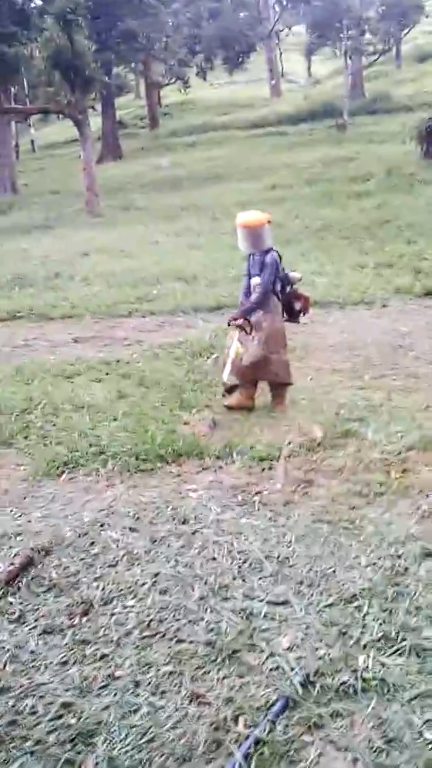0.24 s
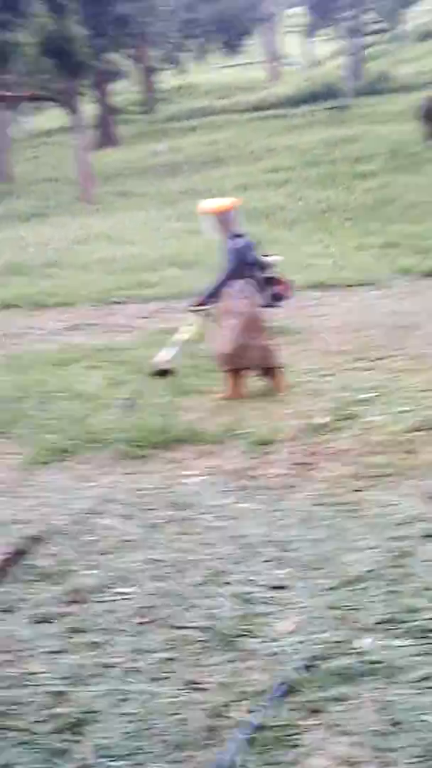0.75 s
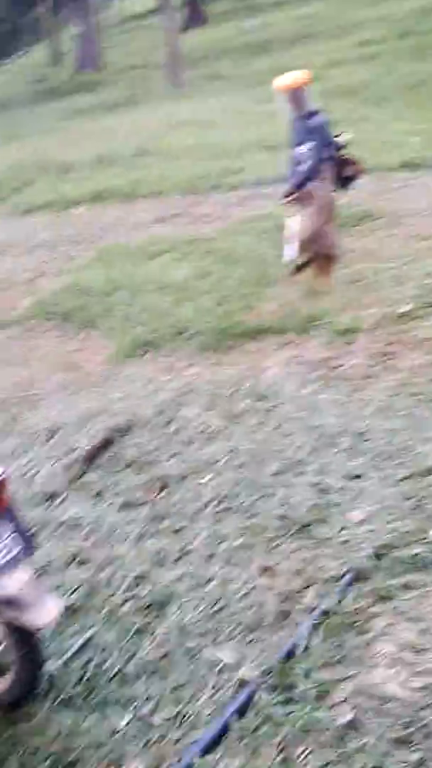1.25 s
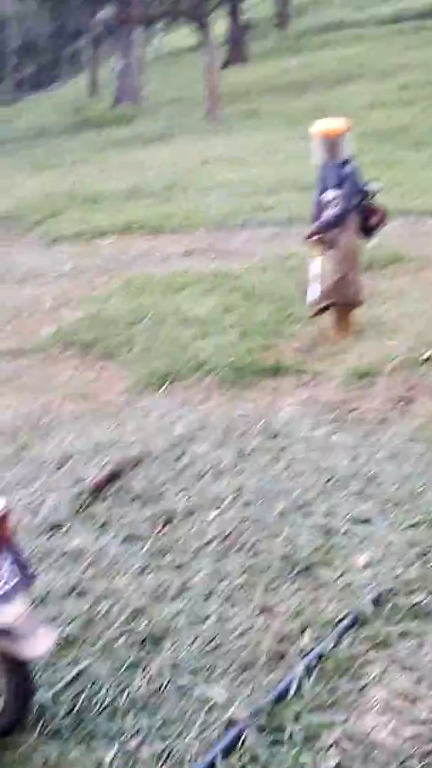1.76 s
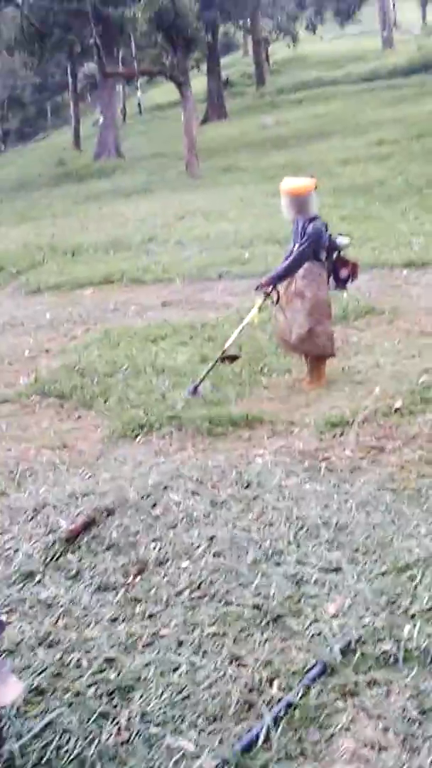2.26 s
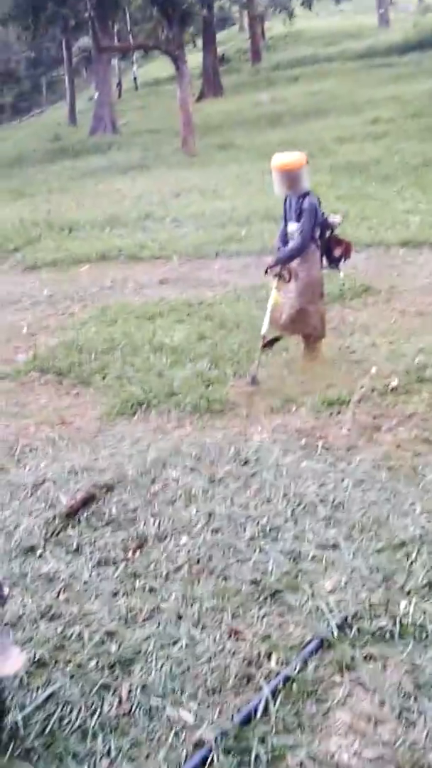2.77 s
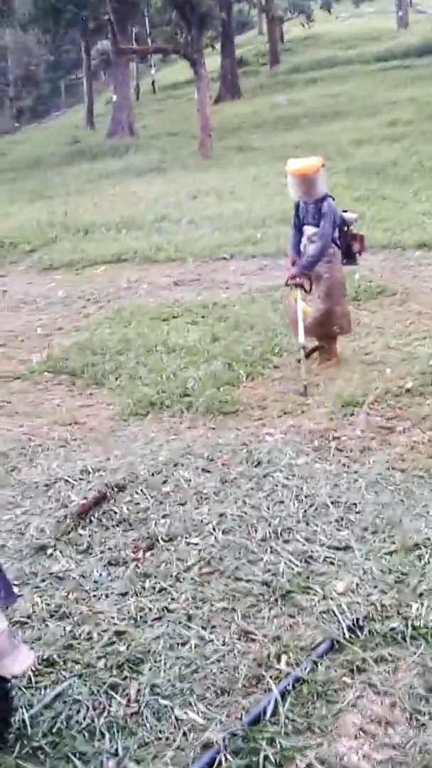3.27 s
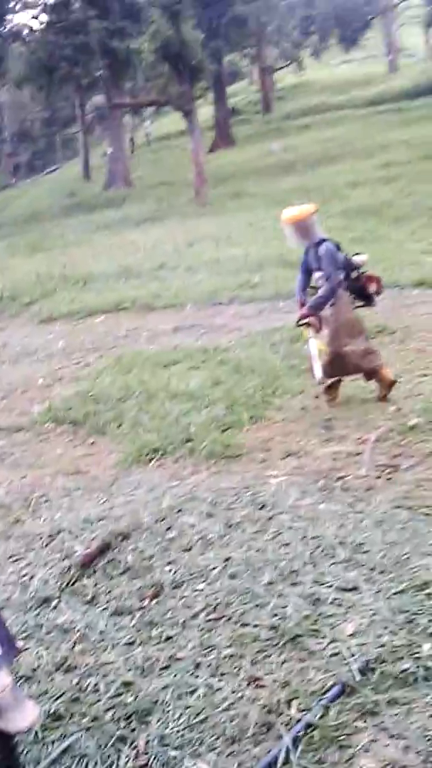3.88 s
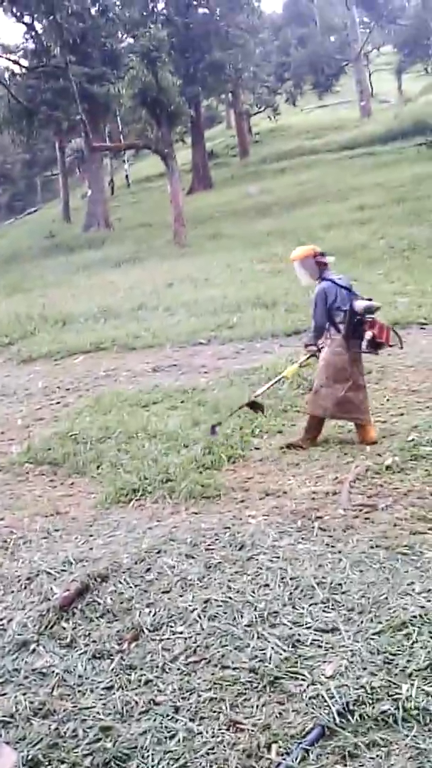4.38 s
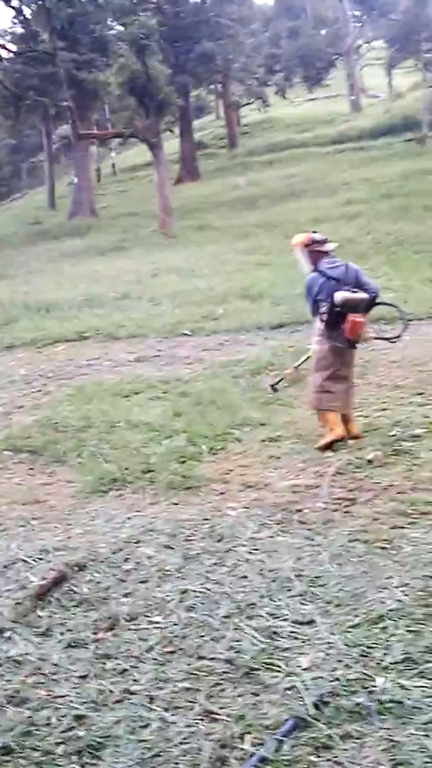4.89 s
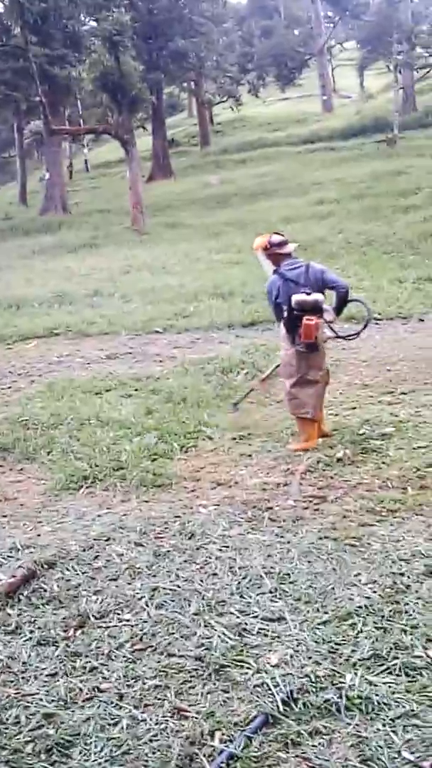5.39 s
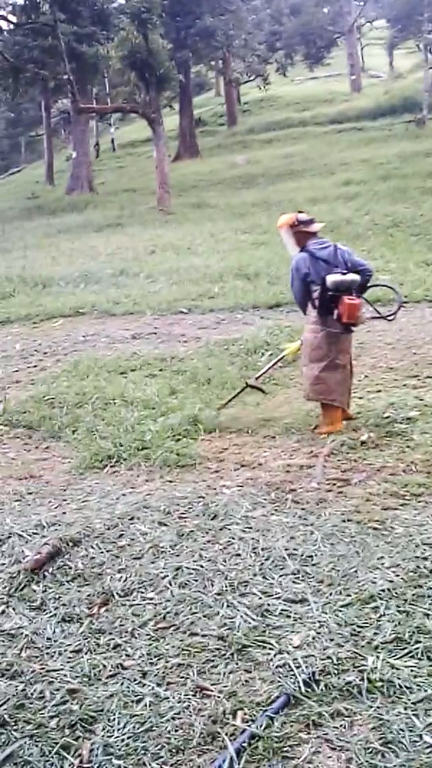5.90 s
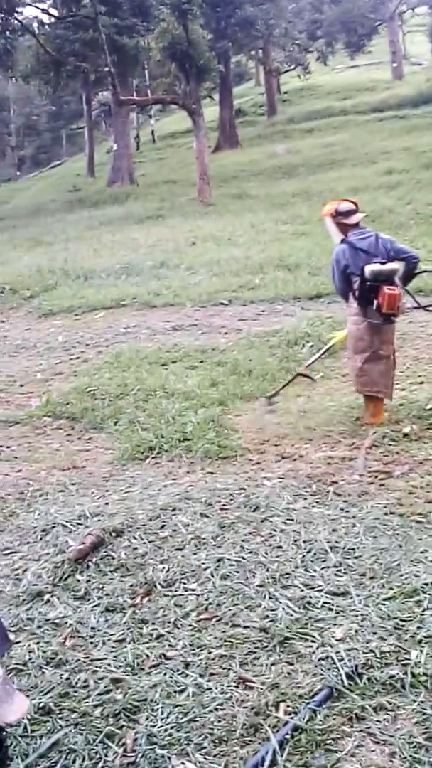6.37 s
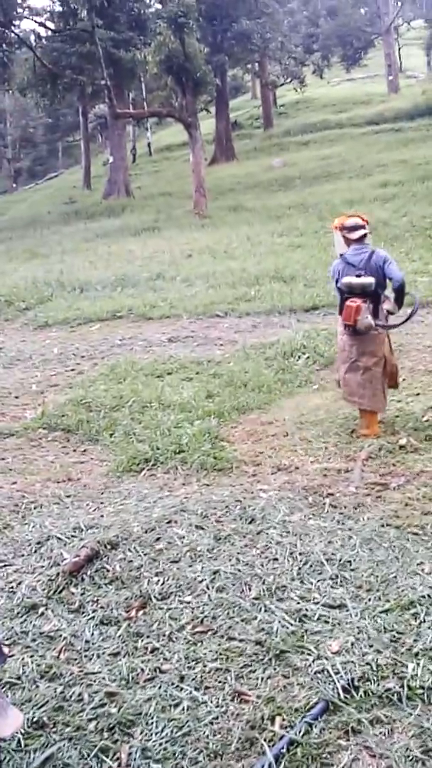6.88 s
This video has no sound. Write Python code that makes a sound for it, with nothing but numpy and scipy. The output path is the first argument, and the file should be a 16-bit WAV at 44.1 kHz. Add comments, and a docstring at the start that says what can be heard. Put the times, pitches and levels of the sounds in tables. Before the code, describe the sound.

Bright, hissing nylon-line whistle and sharp crackling stem snaps over a droning little petrol engine, some metres away outdoors, with one brief rise in revs.

```python
"""Open field: a backpack brush cutter works through grass, some metres from a small microphone.
The two-stroke engine holds its speed while the clutch slips, and rises once when the head runs free.
It sounds as steady overtones plus noise puffed out at each firing; the tone changes as the worker turns.
The two nylon lines whistle (noise pulsed by the turn) and chop stems (short bursts), slower under load.
Tough stems snap brightly; the soil echoes the head; a faint murmur and a high hiss lie underneath."""
import sys
import numpy as np
from scipy import signal
from scipy.fft import rfft, irfft, next_fast_len
from scipy.io import wavfile
from scipy.ndimage import uniform_filter1d, minimum_filter1d, map_coordinates

SR = 44100
rng = np.random.default_rng(int(sys.argv[2]) if len(sys.argv) > 2 else 0)


def to_wav(s):
    """Save 16-bit WAV."""
    ch = np.atleast_2d(s).T  # columns
    pcm = np.round(np.clip(ch, -1, 1) * 32767)  # PCM
    wavfile.write(sys.argv[1], SR, pcm.astype(np.int16))


N = 314874


def amp(db):
    """Amplitude factor of a level in dB."""
    return 10 ** (np.asarray(db) / 20)


def unit(x):
    """x scaled to rms 1."""
    return x / np.sqrt(np.mean(x ** 2) + 1e-20)


def curves(rows):
    """One value per sample for each column after start_s, linear between rows."""
    start_s, *columns = np.transpose(rows)
    return [np.interp(np.arange(N) / SR, start_s, column) for column in columns]


def wobble(rate_hz):
    """Random curve: normal knots, rate_hz a second, joined by lines."""
    knots = rng.standard_normal(int(N * rate_hz / SR) + 4)
    return map_coordinates(knots, [np.arange(N) * rate_hz / SR], order=1)


def coloured(x, points):
    """x through a minimum-phase filter of power gain 1, drawn by (freq_hz, gain_db) points."""
    freq_hz, gain_db = np.transpose(points)
    size = 8192
    bins_hz = np.fft.rfftfreq(size, 1 / SR)
    gain = amp(np.interp(np.log(bins_hz + 1), np.log(freq_hz + 1), gain_db))
    cepstrum = irfft(np.log(gain + 1e-6))
    cepstrum[1:size // 2] *= 2  # folding the cepstrum makes the filter causal
    cepstrum[size // 2 + 1:] = 0
    response = irfft(np.exp(rfft(cepstrum)))
    return signal.fftconvolve(x, response / np.linalg.norm(response))[:N]


def bursts(samples, sizes, t60_s, tail_db):
    """A sharp blow at each sample index, followed by a dying puff of noise, cut off at 400 samples."""
    t = np.arange(400) / SR
    puffs = amp(-60 * t / t60_s) * rng.standard_normal((len(sizes), len(t)))
    puffs *= amp(tail_db) / np.linalg.norm(puffs, axis=1)[:, None]
    puffs[:, 0] = 1
    where = np.asarray(samples)[:, None] + np.arange(len(t))
    return np.bincount(where.ravel(), (sizes[:, None] * puffs).ravel(), N + len(t))[:N]


# engine overtones at four bearings of the worker: multiple_of_firing, level_db
OVERTONES_SIDE_ON = [(1, -26.5), (2, -22), (3, -25), (4, -22.5), (5, -21.5), (6, -9), (7, -58), (8, -47),
                     (9, -4.5), (10, 4), (11, -1), (12, -2), (13, -19), (14, -9.5), (15, -16), (16, -12),
                     (17, -9.5), (18, -34), (19, -34), (20, -15), (21, -39), (22, -13), (23, -41),
                     (24, -32), (25, -34), (26, -43), (27, -27), (28, -27), (29, -43), (30, -61)]
OVERTONES_FACING = [(1, -24), (2, -22.5), (3, -21.5), (4, -38), (5, -28), (6, -18), (7, -19), (8, -5),
                    (9, -2.5), (10, 4.5), (11, -5), (12, -5.5), (13, -28), (14, -13.5), (15, -17),
                    (16, -43), (17, -49), (18, -15), (19, -18), (20, -14.5), (21, -27), (22, -27),
                    (23, -22), (24, -14), (25, -16), (26, -13.5), (27, -16.5), (28, -41), (29, -20.5),
                    (30, -27)]
OVERTONES_TURNING = [(1, -26), (2, -26), (3, -21), (4, -40), (5, -15.5), (6, -11.5), (7, -12.5), (8, -13),
                     (9, -4), (10, 4.5), (11, -10), (12, -9.5), (13, -11), (14, -23), (15, -19), (16, -26),
                     (17, -24), (18, -15), (19, -30), (20, -28), (21, -19), (22, -25), (23, -28), (24, -34),
                     (25, -29), (26, -36), (27, -21), (28, -35), (29, -24), (30, -34)]
OVERTONES_BACK_ON = [(1, -25), (2, -23), (3, -20), (4, -40), (5, -25.5), (6, -11.5), (7, -4.5), (8, -11.5),
                     (9, -3.5), (10, 3.5), (11, -10), (12, -7), (13, -25), (14, -91), (15, -17),
                     (16, -13.5), (17, -13.5), (18, -31), (19, -13), (20, -49), (21, -22), (22, -37),
                     (23, -56), (24, -18.5), (25, -17.5), (26, -32), (27, -17.5), (28, -43), (29, -17),
                     (30, -17.5)]
# engine cover resonances: freq_hz, gain_db
COVER_RING = [(1500, 0), (1640, 5), (1780, 0), (2300, 0), (2460, 9), (2620, 0)]


def muffler_note(crank, bearing):
    """Steady overtones of the firing rate leave the muffler; the engine cover rings along."""
    tables = [OVERTONES_SIDE_ON, OVERTONES_FACING, OVERTONES_TURNING, OVERTONES_BACK_ON]
    levels_db = np.array(tables)[:, :, 1].T
    flutter_db = 1.1
    note = np.zeros(N)
    for k, bearing_db in enumerate(levels_db, 1):
        lag = np.angle(1 / (1 - (k / 10) ** 2 + .6j * k / 10))  # muffler rings near the tenth overtone
        lag -= 0.0987 * (k - 10) ** 2  # higher overtones leave the pipe later
        level_db = np.interp(bearing, range(4), bearing_db) + flutter_db * wobble(5)
        note += amp(level_db) * np.cos(k * crank + lag)
    return coloured(note, COVER_RING)


# cooling fan whine: multiple_of_firing, level_db
FAN_WHINE = [(53, -9.5), (54, -1.5), (55, -21)]


def fan_whine(crank, behind):
    """Cooling fan tones locked to the crank, heard from behind."""
    return behind * sum(amp(db + 6.0 * wobble(7.2)) * np.cos(k * crank) for k, db in FAN_WHINE)


# exhaust roar spectrum: freq_hz, gain_db
ROAR_SPECTRUM = [(300, -46.5), (450, -15), (650, -7), (800, -3.5), (900, -0.5), (1100, -2), (1300, -11),
                 (1650, -5), (2100, -14.5), (2450, -5.5), (3000, -8.5), (5000, -113)]


def exhaust_roar(crank):
    """Noise puffed out at each firing."""
    puff = np.exp(0.087 * np.cos(crank - .6))
    return unit(coloured(puff * rng.standard_normal(N), ROAR_SPECTRUM))


# cylinder fin resonance: freq_hz, gain_db
CYLINDER_FINS = [(1800, -50), (2250, -16), (2450, 0), (2650, -16), (3200, -50)]


def fin_rattle(crank, behind):
    """Each firing knocks the cylinder fins, heard from behind."""
    firings = np.flatnonzero(np.diff(np.floor(crank / (2 * np.pi) - .3)))
    sizes = amp(1.5 * rng.standard_normal(len(firings)))
    knocks = bursts(firings, sizes, t60_s=.01, tail_db=-8)
    return behind * amp(-47 + 2.5 * wobble(3)) * unit(coloured(knocks, CYLINDER_FINS))


# firing rate, held by the slipping clutch, one free rev: start_s, firing_hz
FIRING_RATE = [(0, 88.17), (3.36, 88.15), (3.46, 87.5), (4.06, 87.4), (4.35, 92.9), (4.5, 94.3),
               (4.65, 95.3), (4.8, 93.9), (5.1, 89.4), (5.25, 88.55), (5.45, 88.25), (7.14, 88.15)]
# engine levels: start_s, note_db, roar_db
ENGINE_LEVELS = [(0, -44.5, -42), (.87, -40, -44), (1.05, -37, -42), (2.24, -40.5, -45),
                 (3.3, -40.5, -40.5), (3.86, -41, -39), (4.3, -36, -43), (4.53, -38, -44),
                 (4.71, -35.5, -41.5), (4.95, -37, -39), (5.55, -38.5, -39), (6.34, -40, -41),
                 (6.66, -38, -38), (7.14, -40, -44)]
# worker's bearing: start_s, bearing (0 side-on, 1 facing, 2 turning, 3 back-on)
WORKER_BEARING = [(0, -0.5), (.85, 0), (1.2, 0.7), (2, 1), (3.9, 1), (4.4, 2.5), (4.8, 2.5), (5.3, 3.5),
                  (7.14, 3)]


def engine():
    """One firing a turn drives note, fan, roar and rattle; their mix follows the worker's bearing."""
    firing_hz, = curves(FIRING_RATE)
    note_db, roar_db = curves(ENGINE_LEVELS)
    bearing, = curves(WORKER_BEARING)
    behind = np.clip(bearing - 1.5, 0, 1)
    jittered_hz = firing_hz * (1 + 0.00042 * wobble(30))
    crank = 2 * np.pi * (.48 + np.cumsum(jittered_hz) / SR)
    tones = muffler_note(crank, bearing) + fan_whine(crank, behind)
    roar = exhaust_roar(crank)
    rattle = fin_rattle(crank, behind)
    free_db = .6 * np.clip(firing_hz - 89, 0, None)  # unloaded, it burns cleaner and roars less
    roar_gain = amp(roar_db - free_db + 0.17 * wobble(7))
    return np.sqrt(2) * amp(note_db) * tones + roar_gain * roar + rattle


# line whistle and its bright edge: start_s, whistle_db, edge_over_whistle_db
WHISTLE_LEVELS = [(0.0, -26.5, -27), (0.08, -24, -31), (0.1, -28, -28), (0.34, -20.5, -28),
                  (0.4, -22.5, -19), (0.67, -18, -19), (0.79, -20.5, -14.5), (1.07, -19, -18),
                  (1.43, -30.5, -13), (1.67, -27.5, -17), (2.22, -23, -8), (2.28, -24.5, -13),
                  (2.54, -19.5, -11.5), (2.88, -25, -12), (3.46, -23, -14), (3.52, -27, -12),
                  (3.98, -25.5, -16), (4.69, -19, -12), (5.09, -18.5, -15), (5.43, -24, -14),
                  (6.88, -25, -13), (7.14, -27.5, -13)]
# whistle spectra, from the front and past the worker's body: freq_hz, gain_db
WHISTLE_FRONT = [(2000, -39), (3000, -33), (4100, -9), (4700, -5.5), (5370, 1), (5900, -0.5), (6900, -23.5),
                 (8000, -30.5), (12000, -92.5)]
WHISTLE_PAST_BODY = [(2000, -68.5), (3000, -24.5), (4400, -11), (5120, 2.5), (5600, -2), (6250, 0.5),
                     (7000, -19.5), (8000, -44.5), (12000, -79)]
# bright edge spectrum: freq_hz, gain_db
EDGE_SPECTRUM = [(5000, -83), (6300, 1), (7000, 1.5), (7800, -7.5), (8500, -17), (10000, -28.5),
                 (13000, -42), (16000, -57)]


def line_whistle(air, sweep, behind):
    """The lines tear the air: a whistle band plus a bright edge, pulsed by the sweep."""
    whistle_db, edge_db = curves(WHISTLE_LEVELS)
    front = np.sqrt(1 - behind) * unit(coloured(air[0], WHISTLE_FRONT))
    past_body = np.sqrt(behind) * unit(coloured(air[0], WHISTLE_PAST_BODY))
    edge = unit(coloured(sweep ** 1.13 * air[1], EDGE_SPECTRUM))
    return amp(whistle_db) * (front + past_body + amp(edge_db) * edge)


# stem and thud spectra: freq_hz, gain_db
STEM_SPECTRUM = [(800, -52.5), (1800, -10.5), (2500, -3), (3200, 1.5), (4200, 5), (5400, 3.5), (6500, 0.5),
                 (8000, -20), (14000, -37.5)]
THUD_SPECTRUM = [(600, -50), (1200, -7.5), (1600, -1), (2000, -2.5), (2600, -18), (4000, -51)]
# grass: start_s, cut_db, thud_db, thrash_db
GRASS_LEVELS = [(0, -39, -42, -52.5), (.3, -46, -45, -57), (.36, -31, -42, -56), (.45, -49, -41.5, -53),
                (.85, -45, -42.5, -58), (1.05, -25, -45, -55), (1.14, -37, -53, -52),
                (1.42, -36.5, -54, -58), (1.8, -34, -47.5, -65), (2.0, -29, -43.5, -62),
                (2.25, -37, -41.5, -62), (2.7, -31.5, -41, -54.5), (2.85, -32, -49, -61),
                (3.3, -29.5, -43.5, -60), (3.55, -33, -48, -61), (4.02, -29.5, -44, -65),
                (4.12, -45, -62, -66), (5.0, -35.5, -49, -60), (6.0, -38, -51, -57.5),
                (7.14, -41.5, -51, -61)]
TUFTS_DB = 1.5  # the bite wavers from tuft to tuft


def stem_chops(turns, tough_at):
    """Each line end chops stems once a turn, the longer end harder: a bright cut and a low thud."""
    cut_db, thud_db, _ = curves(GRASS_LEVELS)
    passes = np.flatnonzero(np.diff(np.floor(2 * turns)))
    chance = rng.standard_normal((1000, 3))[:len(passes)]
    scatter_db = 2.2
    samples = np.clip(passes + (.0004 * SR * chance[:, 0]).astype(int), 0, N - 1)
    pass_db = 10 * (np.floor(2 * turns[passes + 1]) % 2 == 0)  # longer end
    tough = np.abs(passes[:, None] - tough_at).min(1) < .003 * SR
    pass_db = pass_db - 20 * tough  # a pass that breaks a tough stem sounds as that snap
    cut_sizes = amp(pass_db + scatter_db * chance[:, 1])
    thud_sizes = amp(pass_db + scatter_db * chance[:, 2])
    cuts = unit(coloured(bursts(samples, cut_sizes, t60_s=0.0081, tail_db=-1.5), STEM_SPECTRUM))
    thuds = unit(coloured(bursts(samples, thud_sizes, t60_s=0.065, tail_db=-5.5), THUD_SPECTRUM))
    return amp(TUFTS_DB * wobble(12)) * (amp(cut_db) * cuts + amp(thud_db) * thuds)


# thrashed grass spectrum: freq_hz, gain_db
THRASH_SPECTRUM = [(100, -39), (220, -9.5), (350, -3), (480, -6), (700, -13), (1200, -61)]
# flying bits: mean level, then shares of the whistle's and of the cut's swells
BITS_DB, BITS_FOLLOW, BITS_BITE = -34, .2, 0.25


def litter(air):
    """Flying bits of grass and low thrashing: noise pulsed by the sweep."""
    whistle_db, _ = curves(WHISTLE_LEVELS)
    cut_db, _, thrash_db = curves(GRASS_LEVELS)
    whistle_swell_db = whistle_db - whistle_db.mean()
    cut_swell_db = cut_db - cut_db.mean()
    bits_db = BITS_DB + BITS_FOLLOW * whistle_swell_db + BITS_BITE * cut_swell_db
    bits = amp(bits_db) * unit(coloured(air[2], STEM_SPECTRUM))
    return bits + amp(thrash_db) * unit(coloured(air[3], THRASH_SPECTRUM))


# head's own tones: multiple_of_turn, level_db
HEAD_TONES = [(2, -65), (4, -71), (5, -72)]


def head_hum(even_turns):
    """Tones locked to the turning head."""
    tones = [amp(db + 2.2 * wobble(9.7)) * np.cos(2 * np.pi * k * even_turns) for k, db in HEAD_TONES]
    return np.sqrt(2) * sum(tones)


# head speed, slowing as it bites, running up between bites: start_s, turns_hz
HEAD_SPEED = [(0, 53), (.3, 64), (.66, 62), (.84, 62.6), (1.0, 66.5), (1.1, 65), (1.32, 51.8), (1.56, 52.3),
              (2.0, 61.8), (2.2, 56.8), (2.36, 59.3), (2.52, 66.8), (2.74, 59.8), (2.9, 60.7), (3.3, 67.2),
              (3.62, 60.6), (3.86, 58.9), (4.0, 61.3), (4.22, 69.5), (4.6, 72.6), (5.16, 67.7), (5.44, 59),
              (5.64, 61.3), (5.78, 58.3), (5.9, 57.9), (6.14, 50.6), (6.24, 52.4), (6.48, 64.6),
              (6.66, 59.6), (6.88, 64.7), (7.14, 64.5)]
# whistle passing the worker's body: start_s, share (0-1)
BODY_SHADOW = [(0, 0), (1.5, 0.03), (3.3, 0.14), (3.7, 0.84), (4.4, 0.96), (7.14, 1)]


def cutter():
    """Each line end sweeps toward the listener and into the grass once a turn; one end is longer."""
    turns_hz = uniform_filter1d(curves(HEAD_SPEED)[0], size=SR // 20)
    even_turns = np.cumsum(turns_hz) / SR
    tough_at = np.round(np.array(TOUGH_STEMS)[:, 0] * SR).astype(int)
    whole = np.cumsum(np.maximum(1, np.round(np.diff(even_turns[tough_at], prepend=0))))
    # phase is bent so that tough stems fall to the longer end
    turns = even_turns + np.interp(np.arange(N), tough_at, whole - even_turns[tough_at])
    angle = 2 * np.pi * turns
    behind = np.clip(curves(BODY_SHADOW)[0], 0, 1)
    once = 0.13 * np.cos(angle - 1.1)
    # the worker's body hides the far half of each sweep, so the whistle pulses more
    twice = (0.17 + 0.15 * behind) * np.cos(2 * angle + 0.67)
    sweep = np.exp(once + twice + 0.02 * wobble(70) + 0.16 * wobble(250))
    air = sweep * rng.standard_normal((4, N))
    return line_whistle(air, sweep, behind) + stem_chops(turns, tough_at) + litter(air) + head_hum(even_turns)


# air murmur and treble hiss spectra: freq_hz, gain_db
MURMUR_SPECTRUM = [(15, -34), (25, -13), (97, -11.5), (219, -11), (264, -9.5), (389, -16.5), (500, -6.5),
                   (650, -18), (1100, -120)]
HISS_SPECTRUM = [(6000, -60), (9000, -2), (11000, 8), (13500, -18), (16000, -5)]


def field():
    """A low, faint murmur of air over the field, and an even hiss in the high treble."""
    murmur_gain = amp(-62.0 + 1.2 * wobble(3.6))
    murmur = unit(coloured(rng.standard_normal(N), MURMUR_SPECTRUM))
    hiss = unit(coloured(rng.standard_normal(N), HISS_SPECTRUM))
    return murmur_gain * murmur + amp(-68.5) * hiss


# tough stems: start_s, peak_db, body_over_peak_db, crack_over_peak_db
TOUGH_STEMS = [(0.0433, -8, -27, -45), (0.0672, -7, -26, -51), (0.1735, -9, -28, -44),
               (0.3277, -5, -21, -53), (0.3456, -7, -17, -48), (0.4728, -7, -25, -41),
               (0.5167, -5, -25, -50), (0.6484, 1, -28, -44), (0.831, -7, -24, -48), (1.0999, -2, -19, -47),
               (1.1313, -1, -21, -52), (1.1628, -6, -16, -40), (1.1792, 0, -20, -46),
               (1.2121, -4, -15, -49), (1.2306, -3, -19, -45), (1.266, -7, -17, -43), (1.283, -4, -21, -48),
               (1.3423, -10, -13, -40), (1.3793, -4, -19, -50), (1.6995, -8, -18, -48),
               (1.718, -7, -18, -47), (1.8208, -7, -20, -43), (1.921, -7, -17, -42), (2.0837, -6, -21, -43),
               (2.1031, -5, -22, -42), (2.1221, -4, -24, -46), (2.2408, -7, -21, -42),
               (2.2767, -10, -18, -43), (2.2937, -2, -25, -47), (2.4104, -8, -18, -45),
               (2.4478, -6, -20, -49), (2.4932, -7, -19, -42), (2.6115, -5, -17, -45),
               (2.6279, -1, -20, -47), (2.6748, -8, -16, -40), (2.6918, -3, -17, -45),
               (2.7252, 0, -20, -49), (2.7566, -5, -17, -45), (2.9073, -6, -14, -41),
               (3.0205, -7, -15, -43), (3.037, 0, -22, -52), (3.0699, -7, -17, -43), (3.2695, -4, -21, -46),
               (3.2994, -3, -20, -45), (3.4206, -2, -19, -51), (3.5798, -6, -19, -47),
               (3.6606, -8, -18, -47), (3.929, -7, -19, -48), (3.9774, -8, -17, -46),
               (4.3705, -8, -26, -45), (4.8359, -3, -23, -45), (4.9521, -6, -24, -41),
               (5.0065, -5, -20, -43), (5.0509, -6, -24, -41), (5.1213, -6, -24, -43),
               (5.215, -5, -23, -39), (5.3882, -7, -23, -47), (5.6635, -8, -24, -46), (5.902, -8, -22, -43),
               (5.9189, -4, -27, -45), (5.9374, -6, -24, -45), (5.9808, -7, -23, -48),
               (6.1614, -9, -24, -42), (6.1823, -7, -23, -47)]
# snap, body and crack spectra: freq_hz, gain_db
SNAP_SPECTRUM = [(2500, -44), (3600, 1), (4400, -10.5), (5300, 10.5), (6200, 0), (7500, -13.5),
                 (9000, -74.5)]
BODY_SPECTRUM = [(1000, -47), (1800, -13), (2600, -1.5), (3400, 2), (4200, 5), (6000, -53)]
CRACK_SPECTRUM = [(5000, -49), (7500, 1), (10000, -5), (15000, -17)]
BODY_S, CRACK_S = 0.003, 0.0041  # body and crack levels are rms over these times
TAIL_ADDS_DB = 2.5  # puff, body and hiss lift the snap's peak


def snaps():
    """Tough stems break with a bright snap, a lower body and a thin crack."""
    start_s, peak_db, body_db, crack_db = np.transpose(TOUGH_STEMS)
    samples = np.round(start_s * SR).astype(int)
    tail_db = -3.5
    click = np.eye(1, 400)[0]
    filter_peak = amp(TAIL_ADDS_DB) * np.abs(coloured(click, SNAP_SPECTRUM)).max()
    snap_sizes = amp(peak_db) / filter_peak
    body_sizes = amp(peak_db + body_db) * np.sqrt(BODY_S * SR)
    crack_sizes = amp(peak_db + crack_db) * np.sqrt(CRACK_S * SR)
    snap = coloured(bursts(samples, snap_sizes, t60_s=0.0081, tail_db=tail_db), SNAP_SPECTRUM)
    body = coloured(bursts(samples, body_sizes, t60_s=0.02, tail_db=tail_db), BODY_SPECTRUM)
    crack = coloured(bursts(samples, crack_sizes, t60_s=0.0051, tail_db=tail_db), CRACK_SPECTRUM)
    return snap + body + crack


# echo off the soil: start_s, delay_ms, strength (0-1)
SOIL_ECHO = [(0, 0.56, 0.34), (.2, 0.56, 0.22), (.6, 0.62, 0.23), (1, 0.66, 0.04), (1.45, 1.3, 0),
             (1.7, 1.05, 0.2), (2.3, 1.44, 0), (2.7, 1.22, 0.23), (3.2, 1.255, 0.2), (4.2, 1.15, 0),
             (4.8, 1.2, 0.12), (5.5, 0.95, 0.03), (7.14, 0.69, 0.06)]


def off_the_ground(x):
    """The low head is heard again a moment later off the soil, which hollows out moving bands."""
    delay_ms, strength = curves(SOIL_ECHO)
    delay_samples = uniform_filter1d(delay_ms, SR // 10) * SR / 1000
    echo = map_coordinates(x, [np.arange(N) - delay_samples], mode="nearest")
    return (x + strength * echo) / np.sqrt(1 + strength ** 2)


def scene():
    """Engine, head with its soil echo, and field, in one channel."""
    return (engine() + off_the_ground(cutter() + snaps()) + field())[None]


TOP_HZ = 15600  # band limit


def record(dry):
    """A quick limiter holds the loudest snaps; deep bass rolls off; nothing is kept above TOP_HZ."""
    needed = np.minimum(1, .99 / (np.abs(dry) + 1e-9))
    held = dry * uniform_filter1d(minimum_filter1d(needed, size=65), size=64)
    m = next_fast_len(N + SR // 2)
    hz = np.fft.rfftfreq(m, 1 / SR)
    bass = 1 / np.sqrt(1 + (45 / (hz + 1)) ** 2)
    return irfft(rfft(held, m) * bass * (hz < TOP_HZ), m)[..., :N]


dry = scene()
out = record(dry)
to_wav(out)
```